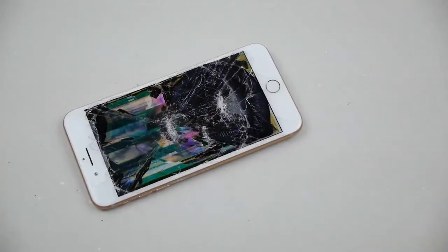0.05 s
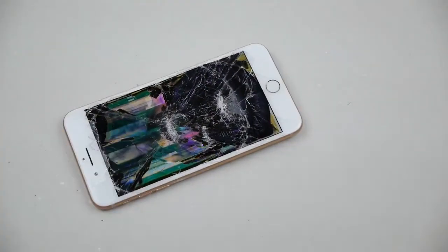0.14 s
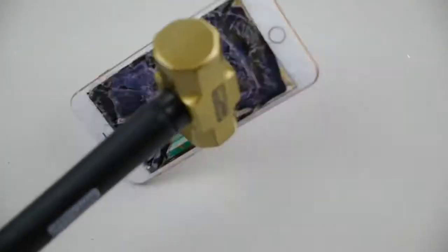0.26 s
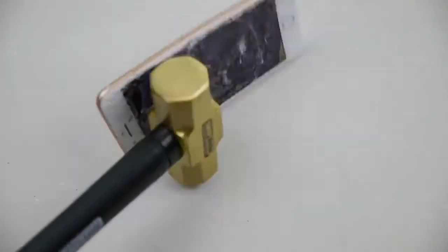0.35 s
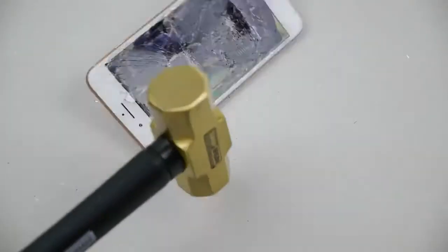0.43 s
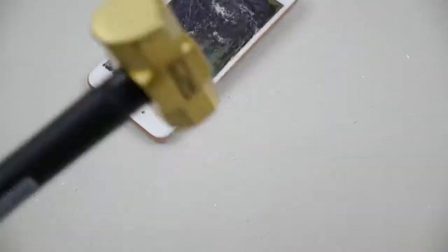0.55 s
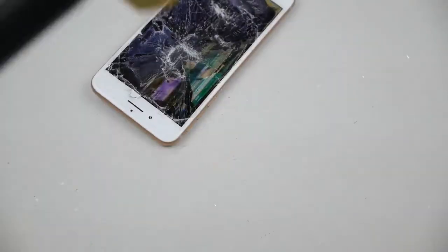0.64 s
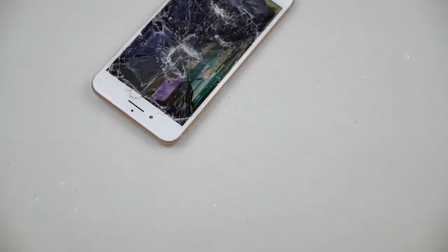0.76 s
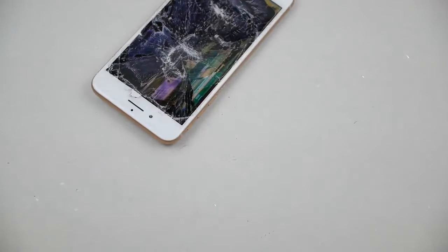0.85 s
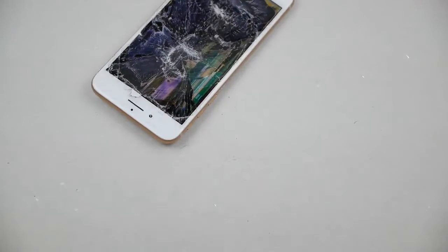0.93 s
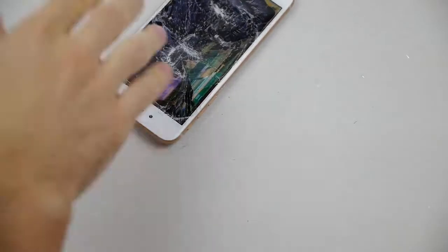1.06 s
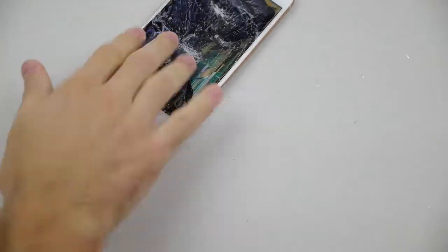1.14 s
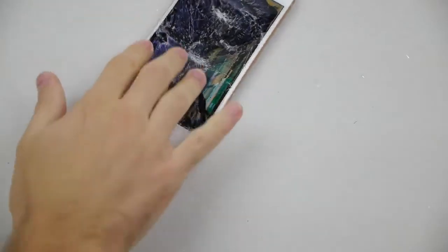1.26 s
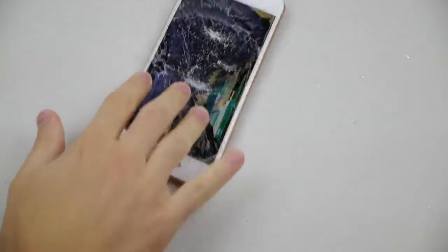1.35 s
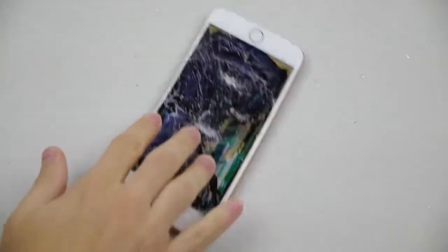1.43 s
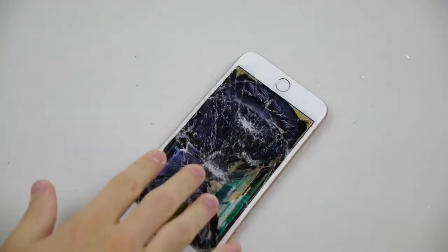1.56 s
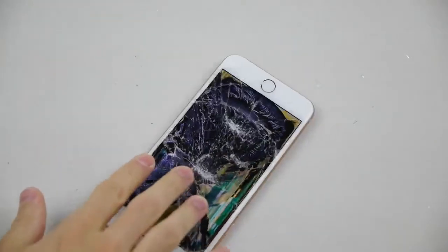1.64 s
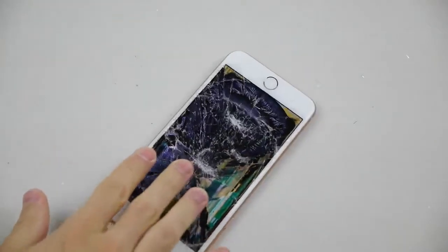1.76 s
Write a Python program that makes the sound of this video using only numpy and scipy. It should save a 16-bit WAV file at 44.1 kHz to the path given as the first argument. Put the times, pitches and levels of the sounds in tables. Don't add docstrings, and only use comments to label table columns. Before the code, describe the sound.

Hard hammer crack and hollow thud on a broken phone, clattering bounces, then a gritty drag

```python
import sys
import numpy as np
from scipy import signal
from scipy.fft import rfft, irfft
from scipy.io import wavfile

SR = 44100
rng = np.random.default_rng(int(sys.argv[2]) if len(sys.argv) > 2 else 0)


def wav_out(sig):
    wavfile.write(sys.argv[1], SR, np.round(np.clip(np.atleast_2d(sig).T, -1, 1) * 32767).astype(np.int16))


def voltage_ratio(decibels):
    exponent = np.asarray(decibels, float) / 20
    return 10 ** exponent


N = 79380

# (frequency [Hz], density [dB per Hz])
AIR_SPECTRUM = [(24, -32), (50, -5), (77, 9), (110, 0.5), (529, -1.5), (990, -7.5), (6650, -14),
                (16000, -18.5)]
# (time [s], gain [dB])
AIR_GAIN_RIDE = [
    (.24, 0.2),
    (.3, -1.5),
    (1.18, -2.5),
    (1.3, 1),
]
# (frequency [Hz], correlation [-1..1])
STEREO_LIKENESS = [(60, 1), (500, .97), (1000, 0.87), (2000, 0.46), (4000, 0.21), (12000, .1)]
# (time [s], thud [dB], crack [dB], crack length [s], crack tilt [dB/octave])
KNOCKS = [(0.2409, -31, -29, 0.011, 1.5), (0.2478, 2.5, -5.5, 0.004, 3), (0.2512, 0.5, -6, 0.0048, -6),
          (0.265, -29, -41, 0.0011, 7), (0.3997, -7.5, -6.5, 0.002, -2.55),
          (0.4617, -9.5, -32.5, 0.036, -3.5), (0.5125, -45, -26, 0.0017, -4),
          (0.5155, -32, -18, 0.0031, 2.5), (0.5204, -8, -22, 0.011, -3.5), (0.584, -13.5, -40, 0.0041, 2),
          (0.608, -37, -25, 0.014, -6), (0.6198, -14, -23.5, 0.0048, 4.5),
          (0.6277, -7, -11.5, 0.0039, -4.5), (0.6557, -48, -20.5, 0.0044, -5.5),
          (0.683, -15.5, -33.5, 0.0048, 5.5), (0.707, -24.5, -29.5, 0.0049, 5.5),
          (0.732, -23.5, -36.5, 0.018, 3), (0.747, -33, -30.5, 0.0052, 3), (0.759, -38, -33.5, 0.01, 4.5),
          (0.8064, -26, -31, 0.0045, 4), (0.823, -55.5, -41, 0.0033, 6), (0.888, -69, -51, 0.02, 5.5),
          (0.92, -53, -48.5, 0.028, 7), (1.01, -54, -58, .003, 16.5), (1.07, -61.5, -50, 0.0016, 4.5),
          (1.125, -80, -69.5, 0.0085, 11.5)]
# (frequency [Hz], density [dB per Hz])
CRACK_SPECTRUM = [(300, -3.5), (1000, 1.3), (2000, 1.5), (4000, 0), (7000, -5), (11000, -10), (16000, -22)]
# (frequency [Hz], level [dB], t60 [s])
TABLE_MODES = [(74, -36, 0.067), (116.1, -10, 0.13), (151.2, -11, 0.074), (201.2, -20.5, 0.17),
               (279.9, -20.5, 0.14), (347.7, -17, 0.14), (396, -16.5, 0.22), (465, -18.5, 0.081),
               (526, -19, 0.13), (559.8, -22, 0.22), (710, -19.5, 0.021), (761, -20, 0.054),
               (918, -20.5, 0.032), (1103, -23, 0.02)]
# (frequency [Hz], t60 [s])
ROOM_T60 = [(80, 0.54), (250, 0.41), (600, 0.5), (1500, 0.61), (4000, 0.48), (10000, 0.27)]
# (frequency [Hz], level [dB])
ROOM_SPECTRUM = [(60, -41), (120, -1.5), (250, 4), (600, 1.5), (1500, 0.7), (4000, -0.5), (10000, -3),
                 (15000, -6.5)]
# (time [s], level [dB], pitch [Hz], strength [1 outward, -1 inward])
TICKS = [(.2483, -25, 2980, -0.23), (.4016, -9, 2010, 0.81), (0.523, -3, 2580, 1),
         (0.5271, -7.5, 2560, 0.8), (0.58, -10, 1480, 1), (0.6603, -12.5, 2400, 0.49),
         (0.809, -35, 4000, 1), (1.2111, -14.5, 4500, -1), (1.2621, -22, 4500, -0.75),
         (1.269, -8, 5040, -1), (1.2725, -14, 5500, -0.72), (1.2759, -6, 4530, -1),
         (1.2773, -4, 3500, -0.57), (1.3103, -17, 6000, -1), (1.3426, -5.5, 3480, 0.85),
         (1.3665, -19, 4000, 0.081), (1.367, -10, 5040, 0.38), (1.3905, -14, 5000, -0.92),
         (1.4025, -12, 7000, 1), (1.452, -18, 5000, -0.21), (1.456, -5, 6000, -0.27),
         (1.4855, -6, 3000, 0.83), (1.503, -9, 4500, 0.73), (1.5045, -10.5, 5000, -1.5),
         (1.5101, 2.5, 4540, -0.66), (1.5814, -7, 4070, 0.24), (1.6368, -25, 8000, 1),
         (1.6617, -21, 7000, -1), (1.78, -33, 3530, 0.85)]
# (time [s], level [dB], pitch [Hz], t60 [s])
SLAPS = [(0.2489, 5, 534, 0.025), (0.2556, 0, 385, 0.022), (.283, -16.5, 450, .012),
         (0.3992, -2.5, 482, 0.016), (0.5256, -19.5, 303, 0.032), (.5805, -11.5, 616, 0.012),
         (0.6197, -5.5, 450, 0.008), (0.6286, -0.5, 484, 0.019), (0.64, -12, 424, .008),
         (0.661, -11, 400, 0.027), (.685, -22, 200, 0.074), (0.709, -16, 277, 0.022),
         (0.844, -34.5, 119.5, 0.14), (0.886, -41.5, 116.8, 0.11), (1.4658, -14.5, 490, 0.016),
         (1.473, -23, 515, 0.014), (1.585, -30.5, 365, .1)]
# (time [s], pitch [Hz], level [dB], t60 [s])
PINGS = [(0.658, 2750, -10, 0.0083), (0.657, 1520, -19, .006), (.808, 4180, -35, 0.026),
         (1.069, 2900, -42.5, 0.021), (1.269, 6330, -12, 0.021), (1.277, 3010, -19, 0.036),
         (1.363, 2370, -14.5, 0.068), (1.366, 3050, -16, 0.017), (1.367, 7260, -18, 0.016),
         (1.456, 6600, -14, .015), (1.403, 8200, -17, 0.017), (1.27, 4900, -20, .02),
         (1.365, 4230, -23, 0.022), (1.456, 3640, -12.5, 0.029), (1.51, 2845, -28, 0.12),
         (1.779, 2990, -34, 0.083), (1.275, 510, -26, 0.034)]
# (time [s], grit [dB], table hum [dB])
DRAG = [
    (1.185, -100.5, -72),
    (1.202, -39, -57),
    (1.259, -45.5, -84),
    (1.271, -31, -57),
    (1.401, -32.5, -54),
    (1.518, -25, -57),
    (1.6, -42, -67),
    (1.719, -36, -59),
    (1.74, -51.5, -71),
]
# (time [s], crunch [dB], length [s], centre [Hz], thud [dB])
CRUNCHES = [(1.194, -42, 0.0049, 4010, -57), (1.203, -35.5, 0.0015, 7980, -55),
            (1.2086, -18, 0.0031, 4700, -39), (1.2617, -22.5, 0.0019, 4600, -28),
            (1.271, -15.5, 0.0038, 6060, -57), (1.277, -14, 0.0024, 4360, -61),
            (1.282, -23, .004, 7060, -52), (1.303, -21, 0.0033, 8170, -59),
            (1.336, -21, 0.0097, 4660, -22.5), (1.362, -8, 0.0051, 4200, -20),
            (1.392, -28, .008, 4550, -57), (1.3997, -13.5, 0.0031, 7700, -33),
            (1.405, -18, 0.0023, 6050, -35), (1.438, -18.5, 0.003, 8100, -39),
            (1.451, -11, 0.0037, 5000, -20), (1.465, -35, 0.0025, 3460, -29),
            (1.484, -15.5, 0.002, 4400, -23.5), (1.491, -20, 0.011, 7000, -49),
            (1.5064, -14.5, 0.0027, 4870, -51), (1.518, -23.5, 0.0046, 4770, -41),
            (1.531, -41, 0.0017, 6200, -33.5), (1.58, -22, 0.0017, 7400, -48),
            (1.617, -28, 0.0054, 8900, -61), (1.632, -23.5, 0.0046, 11050, -102),
            (1.653, -27.5, 0.014, 9900, -42), (1.695, -29.5, 0.0091, 7720, -69),
            (1.712, -40, 0.0058, 9800, -75), (1.751, -36, 0.048, 11000, -70),
            (1.769, -35.5, 0.024, 4786, -63)]
# (frequency [Hz], density [dB per Hz])
GRIT_SPECTRUM = [(350, 4.5), (600, 3.5), (1140, -2.5), (2440, 2.5), (3120, 5), (6730, 7.5), (11500, 7),
                 (16000, 4.5)]

AIR_DB = -57
CRACK_RISE, CRUNCH_RISE = 0.18, 1.45
MODE_SPREAD_DB = 2.5
TABLE_LOW_CUT_HZ, GLASS_LOW_CUT_HZ = 62, 300
ROOM_WOOD_DB, ROOM_SLAP_DB, ROOM_GLASS_DB, ROOM_GRIT_DB = -8, -16, -6.5, -11
ROOM_RISE_S = 0.0028
TICK_CYCLES, TICK_PAN_DB = 3.4, 2.5
CONTACT_HZ = 1800
PING_HIT_S = 0.0015
HUM_LOW_HZ, HUM_HIGH_HZ = 100, 144
GRIT_PER_S, GRIT_SPREAD_DB, DUST_SHARE = 3000, 2, 0.48
CRUNCH_OCTAVES, CRUNCH_PEAK_DB = 1, 10.5
SHARD_DB, SHARD_T60_S, SHARD_PITCH_RATIO = -22.5, 0.0036, 0.646
CEILING, TOP_HZ = 0.97, 15900


def rms_one(x):
    return x / np.sqrt(np.mean(x ** 2) + 1e-20)


def at_hz(points, hz):
    table_hz, value = np.array(points)[:, 0], np.array(points)[:, 1]
    return np.interp(np.log(hz), np.log(table_hz), value)


def click_at(s):
    return np.arange(N) == int(s * SR)


def ring(clicks, hz, t60_s):
    radius = voltage_ratio(-60 / (t60_s * SR))
    w = 2 * np.pi * hz / SR
    return signal.lfilter([0, np.sin(w)], [1, -2 * radius * np.cos(w), radius * radius], clicks + 1e-18)


def high_pass(x, order, cut_hz):
    return signal.sosfilt(signal.butter(order, cut_hz, "high", fs=SR, output="sos"), x)


def colour(pair, db_at):
    size = pair.shape[1]
    hz = np.fft.rfftfreq(size, 1 / SR) + 1
    alike = np.clip(at_hz(STEREO_LIKENESS, hz), -1, 1)
    mid, side = rfft(pair)
    both = np.sqrt(1 + alike) * mid + np.sqrt(1 - alike) * side * [[1], [-1]]
    return rms_one(irfft(both * voltage_ratio(db_at(hz)), size))


def grains(size):
    sizes = voltage_ratio(GRIT_SPREAD_DB * np.minimum(rng.exponential(1, size), 4))
    sizes = sizes * (rng.random(size) < GRIT_PER_S / SR)
    return (sizes + DUST_SHARE) * rng.standard_normal((2, size))


def burst(s, db, length_s, rise, db_at):
    out = np.zeros((2, N + SR))
    t = np.arange(4096) / SR
    i = int(s * SR)
    shape = (1 - np.exp(-t / (rise * length_s))) * np.exp(-t / length_s)
    out[:, i:i + 4096] = voltage_ratio(db) * shape / shape.max() * colour(grains(4096), db_at)
    return out[:, :N]


def room_air(t):
    level_db = AIR_DB + np.interp(t, *np.transpose(AIR_GAIN_RIDE))
    return voltage_ratio(level_db) * colour(rng.standard_normal((2, N)), lambda hz: at_hz(AIR_SPECTRUM, hz))


def crack_colour(tilt):
    return lambda hz: at_hz(CRACK_SPECTRUM, hz) + tilt * np.log2(np.maximum(hz, 500) / 4000)


def cracks():
    return sum(burst(s, db, length_s, CRACK_RISE, crack_colour(tilt)) for s, _, db, length_s, tilt in KNOCKS)


def table_top(rows, rumble):
    s, db = np.transpose(rows)
    at = (s * SR).astype(int)
    spread = rng.standard_normal((len(s), len(TABLE_MODES)))
    out = np.zeros(N)
    for k, (hz, level_db, t60_s) in enumerate(TABLE_MODES):
        clicks = rumble.copy()
        clicks[at] += voltage_ratio(db + MODE_SPREAD_DB * spread[:, k])
        out += (-1) ** k * voltage_ratio(level_db) * ring(clicks, hz, t60_s)
    return out


def crack_echo():
    out = np.zeros(N + SR)
    click = np.zeros((2, 512))
    click[0, 128] = 1
    for s, _, db, length_s, tilt in KNOCKS:
        i = int(s * SR) - 128
        energy = np.sqrt(length_s * SR / 1024)
        out[i:i + 512] += voltage_ratio(db) * energy * colour(click, crack_colour(tilt))[0]
    return out[:N]


def room(x):
    t = np.arange(SR) / SR
    hz = np.fft.rfftfreq(SR, 1 / SR) + 1
    whole = rfft(colour(rng.standard_normal((2, SR)), lambda f: at_hz(ROOM_SPECTRUM, f)))
    tail = 0
    for centre_hz in 40 * 2 ** np.arange(10):
        band = np.maximum(1 - np.abs(np.log2(hz / centre_hz)), 0)
        tail = tail + irfft(whole * band) * voltage_ratio(-60 * t / at_hz(ROOM_T60, centre_hz))
    tail = tail * (1 - np.exp(-t / ROOM_RISE_S)) / 30
    return signal.fftconvolve(tail, x[None], axes=1)[:, :N]


def ticks():
    out = 0
    for (s, db, hz, way), side in zip(TICKS, rng.uniform(-1, 1, len(TICKS))):
        pan = voltage_ratio(TICK_PAN_DB * side * np.array([[1], [-1]]))
        soften = signal.butter(1, min(2 * hz, 15000), fs=SR)
        one = signal.lfilter(*soften, ring(click_at(s), hz, TICK_CYCLES / hz))
        out = out + way * pan * voltage_ratio(db) * one
    return out


def slaps():
    out = sum(voltage_ratio(db) * ring(click_at(s), hz, t60_s) for s, db, hz, t60_s in SLAPS)
    return signal.lfilter(*signal.butter(1, CONTACT_HZ, fs=SR), out)


def pings():
    out = np.zeros(N)
    t = np.arange(N) / SR
    for s, hz, db, t60_s in PINGS:
        touch = rng.standard_normal(N) * (t >= s) * np.exp(-np.maximum(t - s, 0) / PING_HIT_S)
        out += voltage_ratio(db) * ring(touch, hz, t60_s) / np.sqrt(PING_HIT_S * SR / 2)
    return out


def drag_rumble(t):
    s, _, hum_db = np.transpose(DRAG)
    band = signal.butter(2, [HUM_LOW_HZ, HUM_HIGH_HZ], "band", fs=SR)
    return signal.lfilter(*band, rng.standard_normal(N)) * voltage_ratio(np.interp(t, s, hum_db, left=-140))


def drag_grit(t):
    s, grit_db, _ = np.transpose(DRAG)
    stream = colour(grains(N), lambda hz: at_hz(GRIT_SPECTRUM, hz))
    return voltage_ratio(np.interp(t, s, grit_db, left=-140)) * stream


def crunch_colour(centre_hz):
    def db_at(hz):
        octaves = np.log2(hz / centre_hz)
        return at_hz(GRIT_SPECTRUM, hz) + CRUNCH_PEAK_DB * np.exp(-(octaves / CRUNCH_OCTAVES) ** 2)
    return db_at


def crunches():
    out = 0
    for s, db, length_s, centre_hz, _ in CRUNCHES:
        one = burst(s, db, length_s, CRUNCH_RISE, crunch_colour(centre_hz))
        out = out + one + voltage_ratio(SHARD_DB) * ring(one, centre_hz * SHARD_PITCH_RATIO, SHARD_T60_S)
    return out


def scene():
    t = np.arange(N) / SR
    knock_thuds = [row[:2] for row in KNOCKS]
    crunch_thuds = [(row[0], row[4]) for row in CRUNCHES]
    wood = table_top(knock_thuds + crunch_thuds, drag_rumble(t))
    wood, flat = high_pass([wood, slaps()], 4, TABLE_LOW_CUT_HZ)
    grit = crunches() + drag_grit(t)
    snaps, grit, sharp = high_pass([cracks(), grit, ticks()], 2, GLASS_LOW_CUT_HZ)
    to_room = voltage_ratio(ROOM_WOOD_DB) * wood + voltage_ratio(ROOM_SLAP_DB) * flat
    to_room = to_room + voltage_ratio(ROOM_GLASS_DB) * crack_echo() + voltage_ratio(ROOM_GRIT_DB) * (grit[0] + sharp[0])
    return room_air(t) + wood + flat + snaps + sharp + pings() + grit + room(to_room)


def band_limit(x):
    return signal.sosfilt(signal.butter(12, 16450, fs=SR, output="sos"), x)


def record(dry):
    flat = CEILING * dry / (1 + (dry / CEILING) ** 6) ** (1 / 6)
    cut = signal.cheby2(14, 70, TOP_HZ + 650, fs=SR, output="sos")
    return band_limit(signal.sosfilt(cut, flat))


dry = scene()
out = record(dry)
wav_out(out)
```